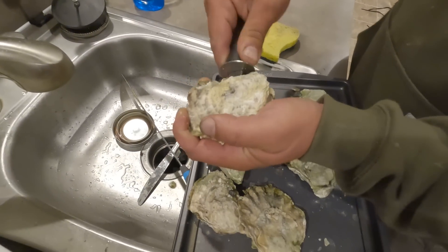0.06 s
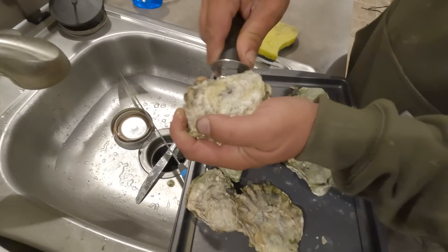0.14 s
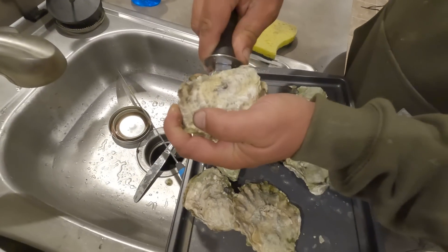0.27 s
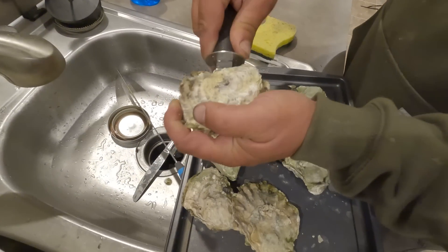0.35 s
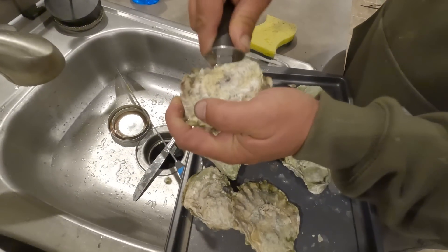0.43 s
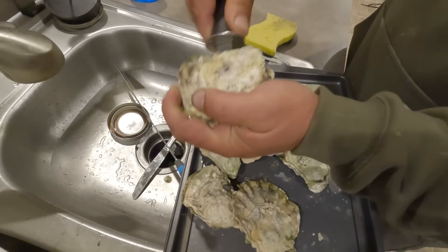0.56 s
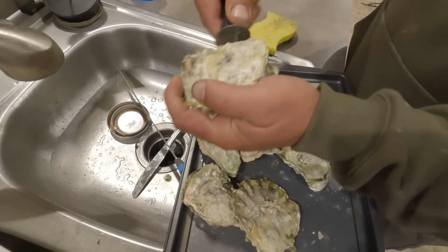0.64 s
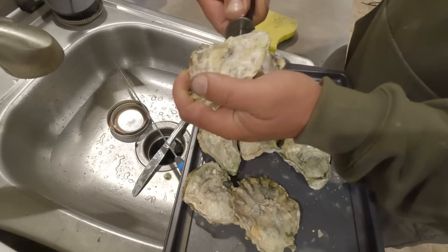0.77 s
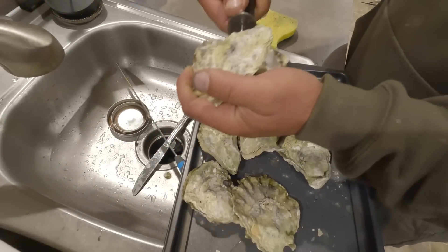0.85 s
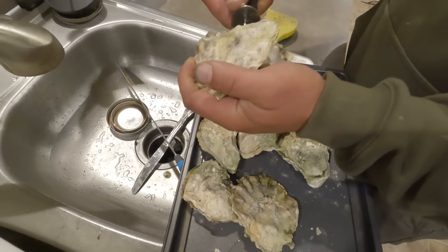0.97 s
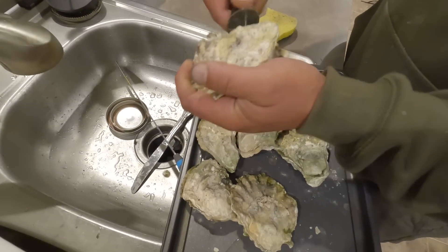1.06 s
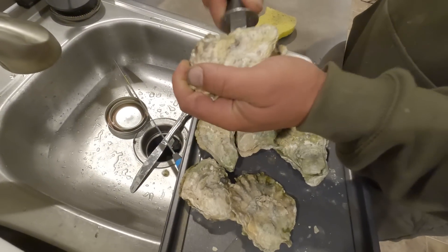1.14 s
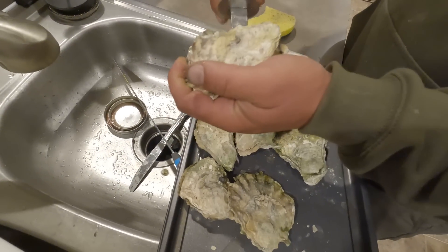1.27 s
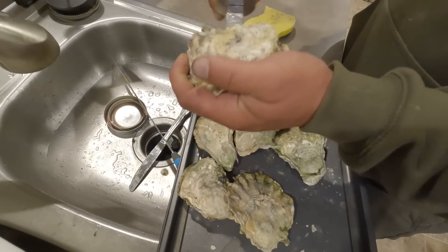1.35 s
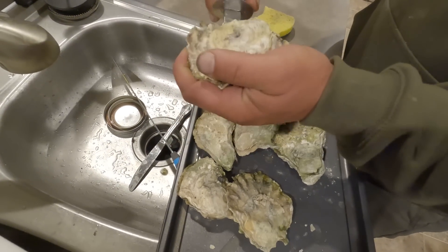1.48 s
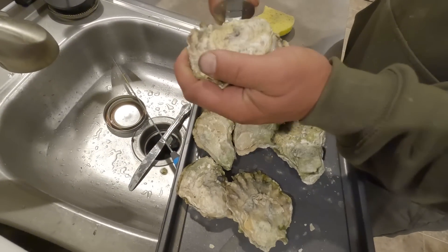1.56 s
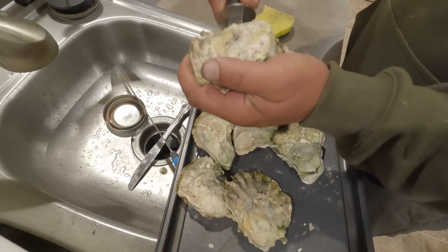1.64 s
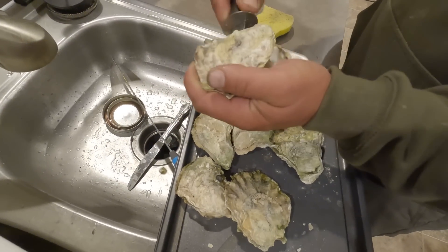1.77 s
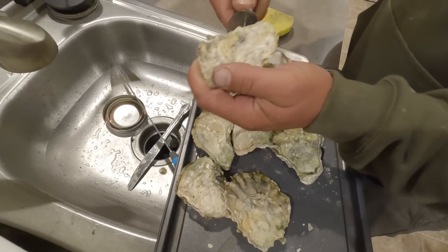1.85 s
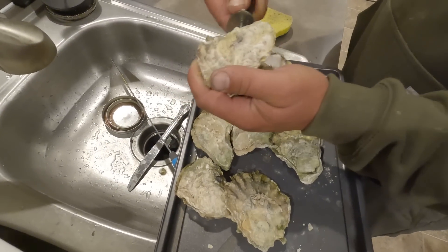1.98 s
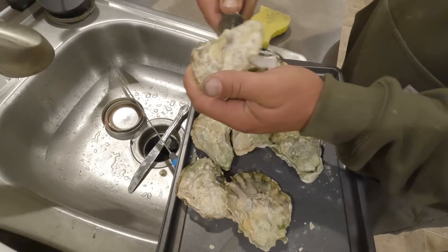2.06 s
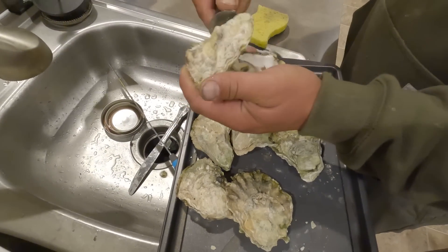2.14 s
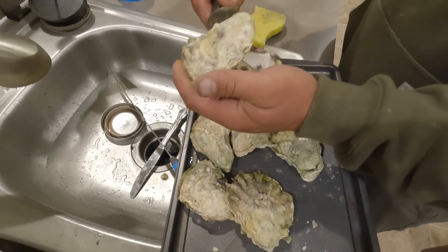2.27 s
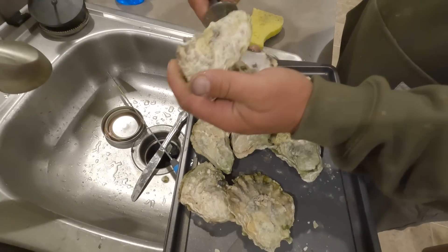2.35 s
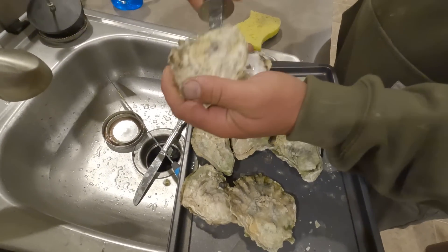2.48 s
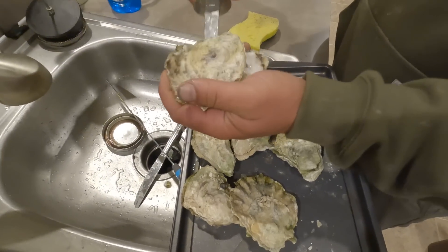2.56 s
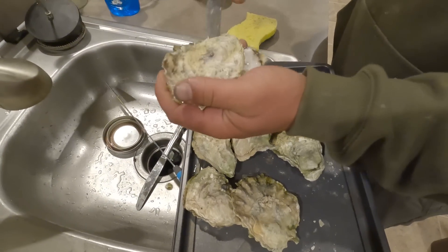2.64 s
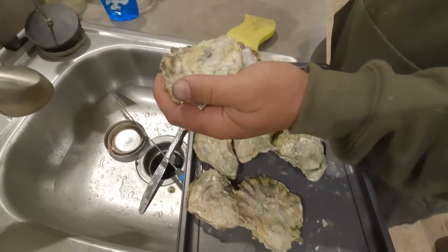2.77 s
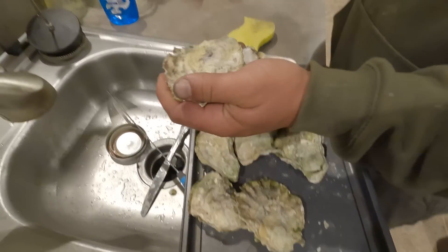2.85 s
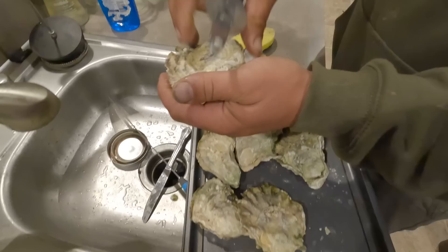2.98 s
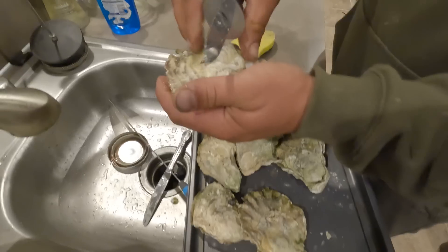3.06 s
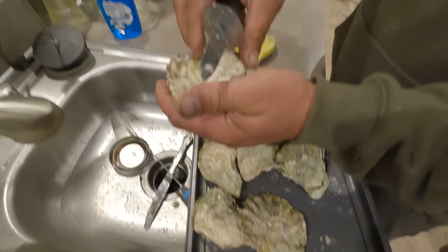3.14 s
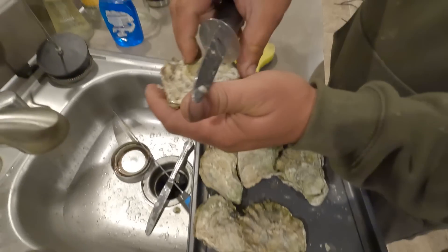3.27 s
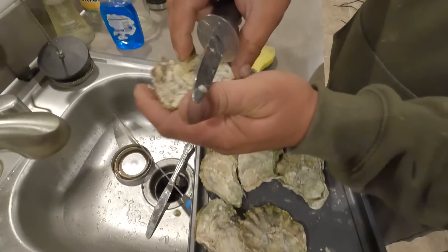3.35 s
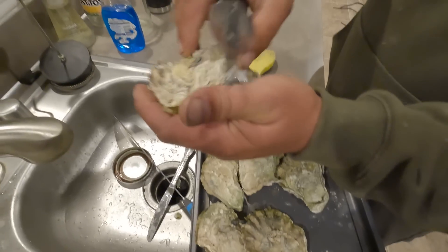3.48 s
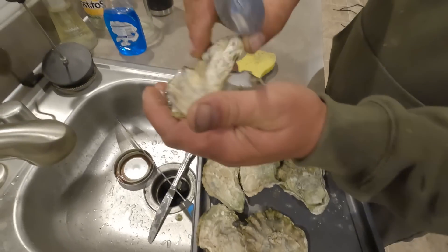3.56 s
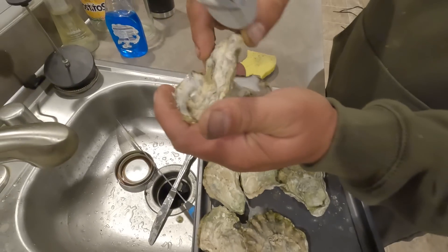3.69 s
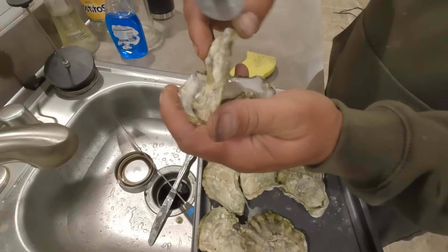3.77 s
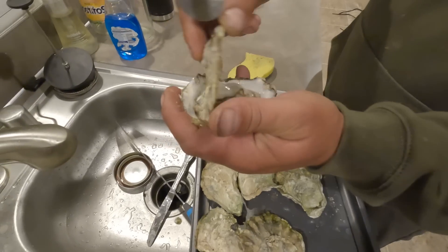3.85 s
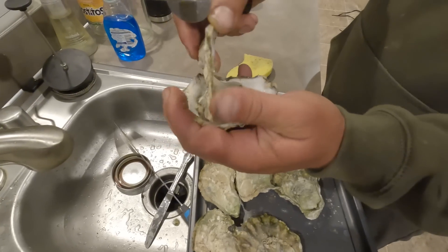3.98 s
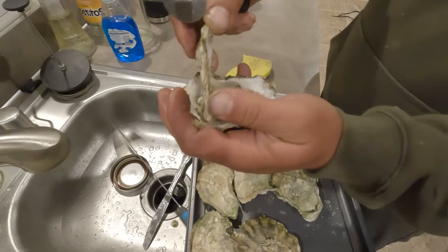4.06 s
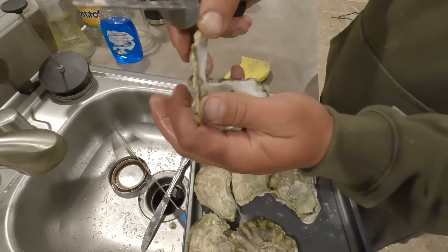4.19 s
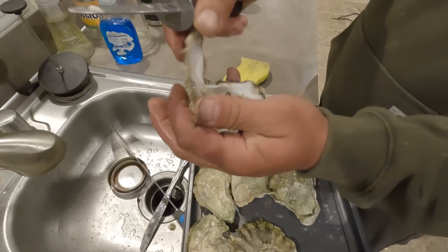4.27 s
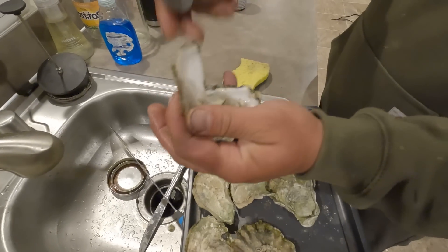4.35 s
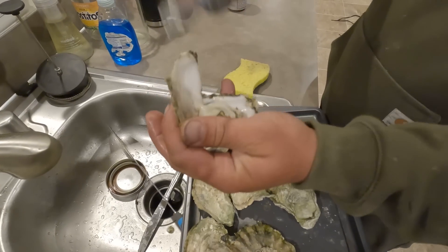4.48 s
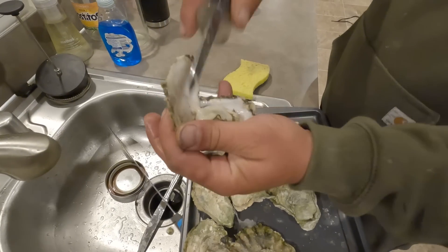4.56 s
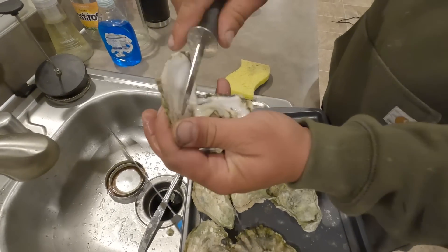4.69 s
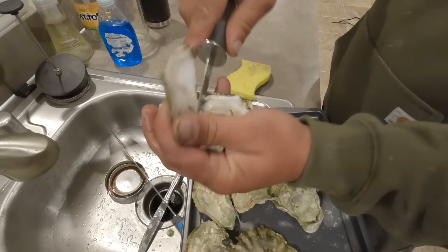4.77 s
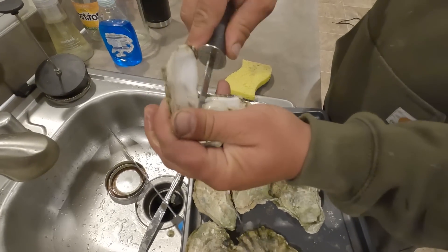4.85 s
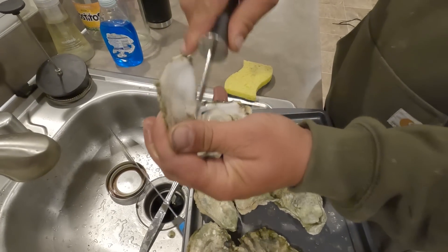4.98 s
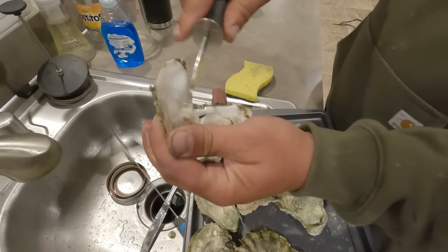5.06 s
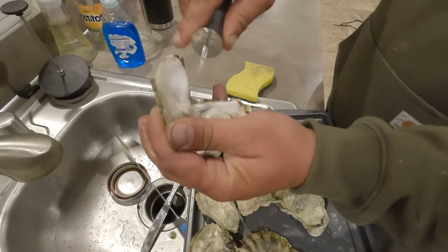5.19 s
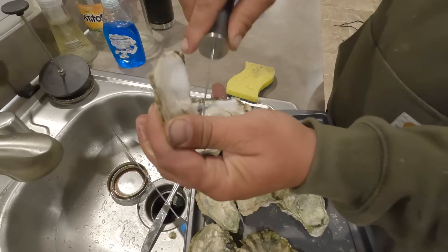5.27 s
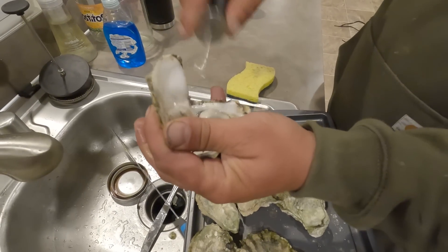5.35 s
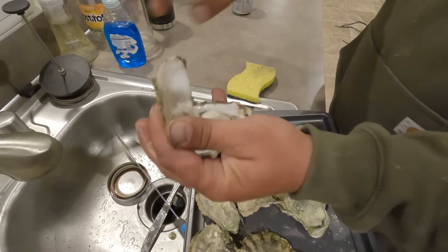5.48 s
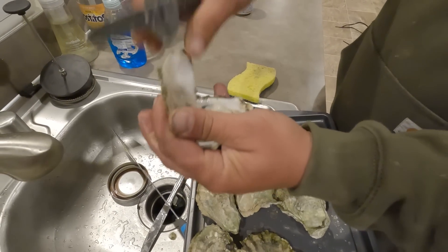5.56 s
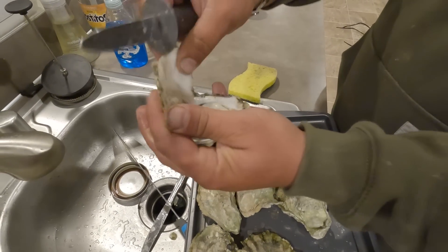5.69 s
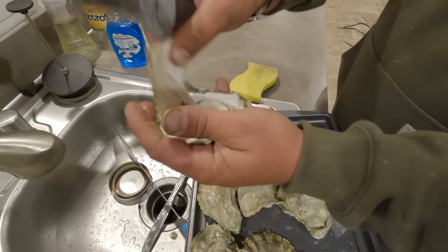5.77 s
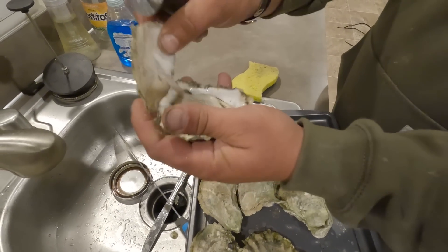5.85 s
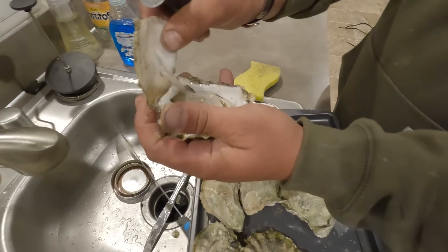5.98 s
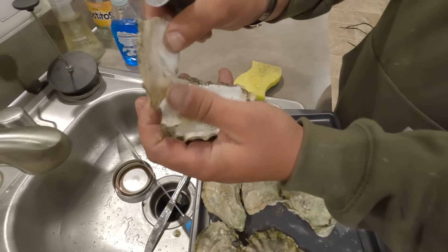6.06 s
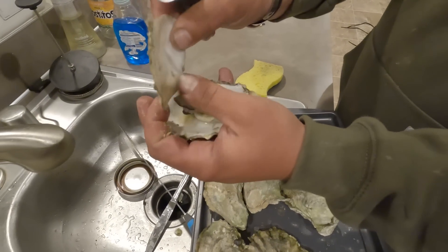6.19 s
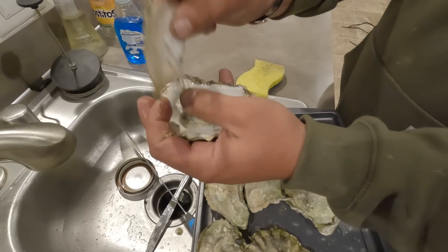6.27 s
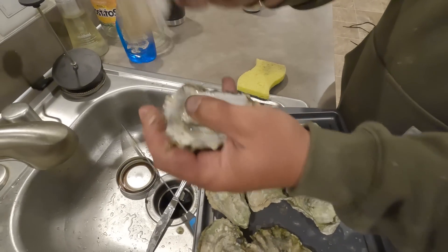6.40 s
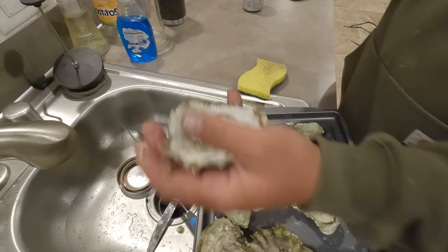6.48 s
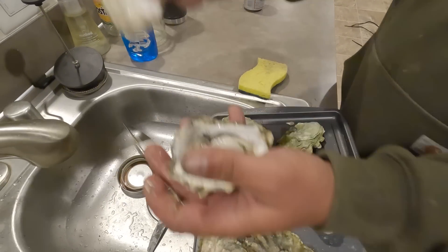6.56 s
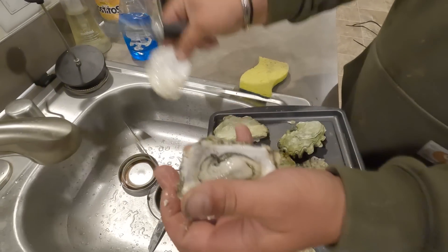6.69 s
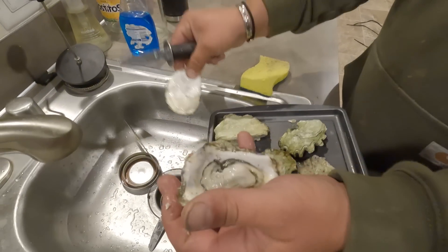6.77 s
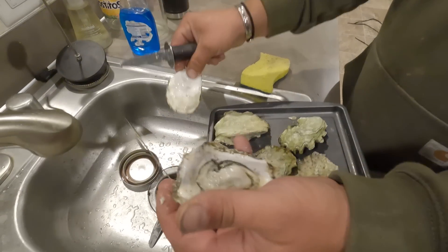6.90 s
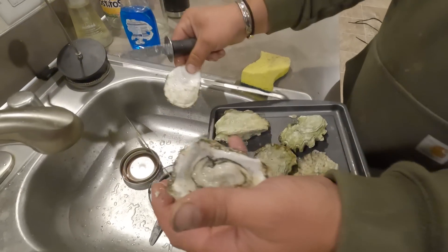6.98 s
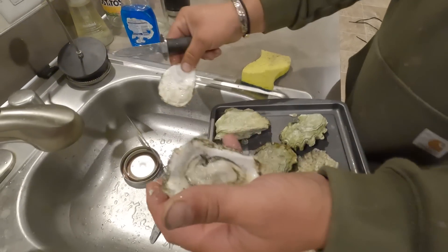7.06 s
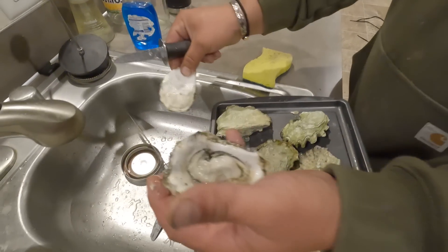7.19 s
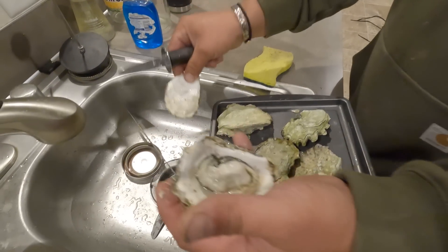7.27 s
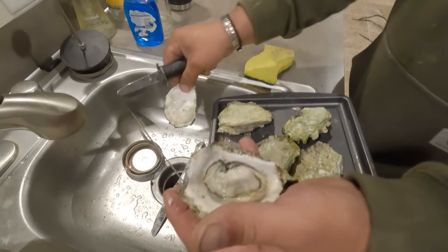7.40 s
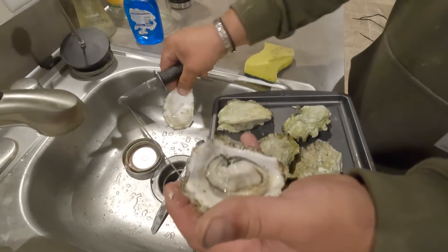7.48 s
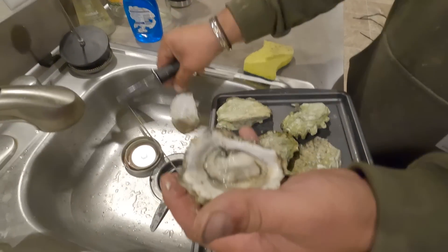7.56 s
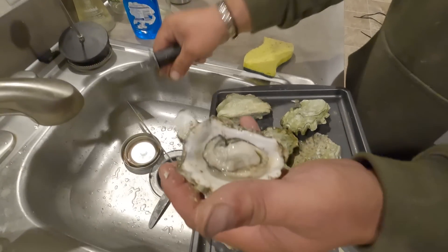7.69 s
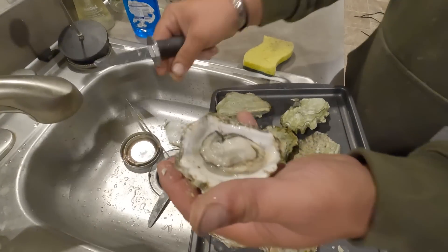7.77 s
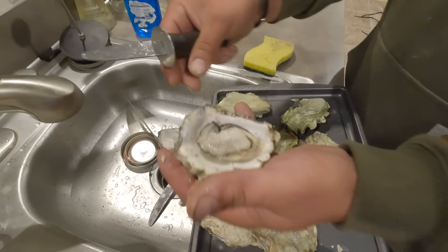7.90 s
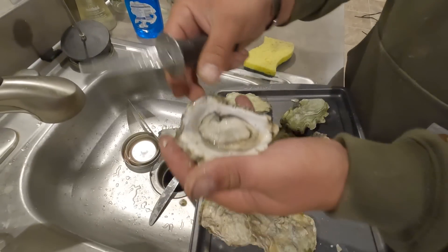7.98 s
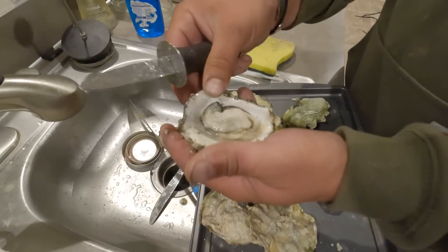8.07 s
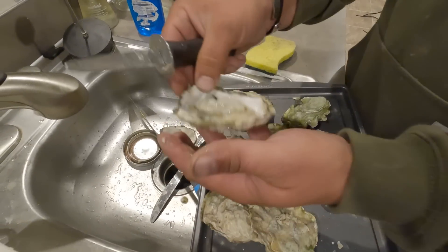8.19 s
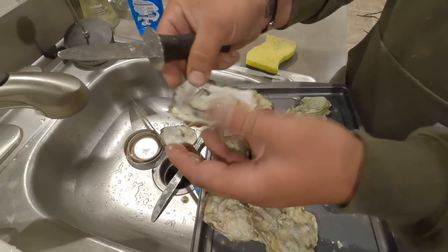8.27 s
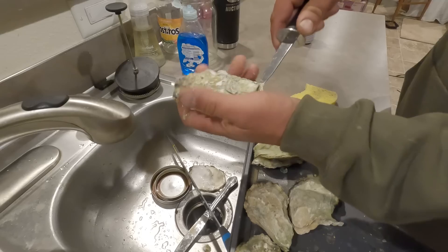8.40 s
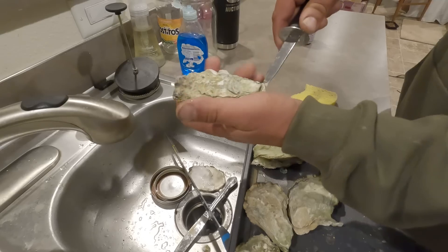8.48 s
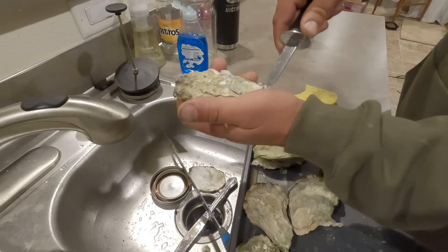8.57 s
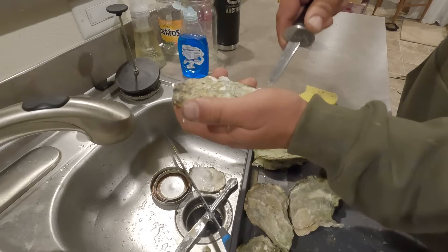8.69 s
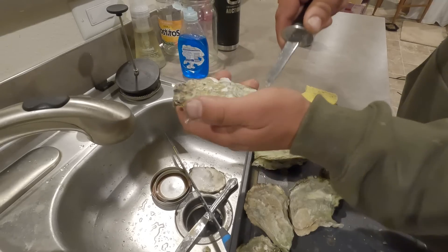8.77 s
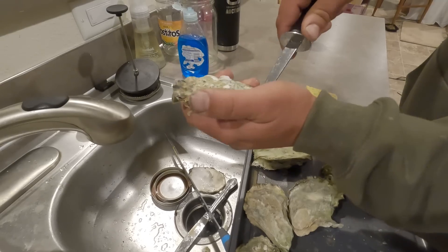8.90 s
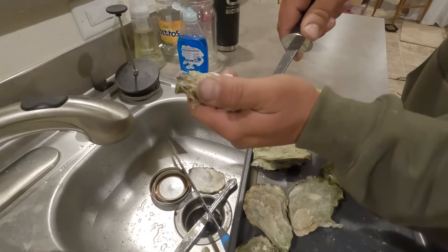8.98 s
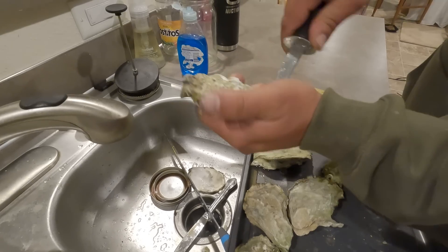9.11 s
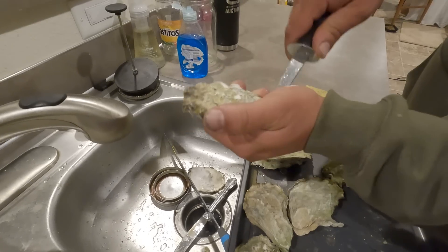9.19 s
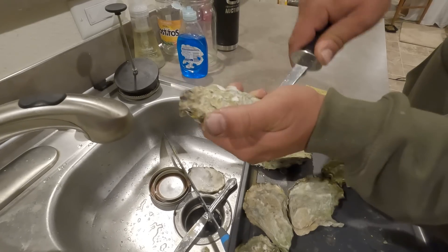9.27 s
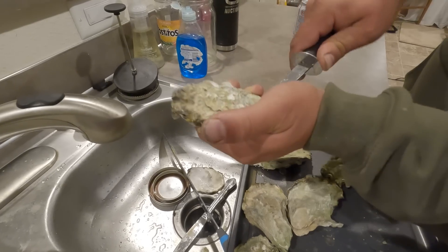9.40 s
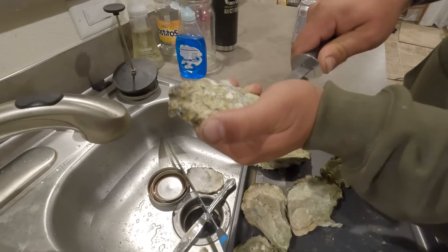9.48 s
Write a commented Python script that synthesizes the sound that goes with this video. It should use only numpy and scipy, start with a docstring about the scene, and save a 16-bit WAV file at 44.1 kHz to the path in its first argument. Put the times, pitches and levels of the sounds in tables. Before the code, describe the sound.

An oyster shell snaps and crumbles under a scraping knife, heard up close over the low hum of a kitchen. The steel blade squeaks very briefly, pings as it slips free and makes several sharp taps. After a lull comes the loudest sound, the top shell bouncing in a metal sink with a hollow ring. Dull handling bumps, a faint sleeve rustle and small clicks follow as the next oyster is picked up.

```python
"""A knife prises open an oyster over a steel kitchen sink, close to the microphone.
The shell snaps and crumbles at the hinge; each fracture, scrape or tap excites its damped modes.
Stick-slip friction makes the blade squeak once, and the steel rings as it springs free.
The loose lid bounces in the basin, exciting its plate modes, and the next oyster is picked up.
Soft bumps, a rustling sleeve and short reverberation lie over the low hum of the room."""
import sys
import numpy as np
from scipy import signal
from scipy.fft import rfft, irfft
from scipy.io import wavfile

SR = 44100
rng = np.random.default_rng(int(sys.argv[2]) if len(sys.argv) > 2 else 0)


def dump_mix(stems):
    """Bounce the given channels to the path in sys.argv[1] as a 16-bit WAV at rate SR."""
    frames = np.atleast_2d(stems).T  # one column per channel
    limited = np.clip(frames, -1, 1)  # hard clip at full scale
    pcm = np.round(limited * 32767).astype(np.int16)
    wavfile.write(sys.argv[1], SR, pcm)


N = 420713


def gain_of(db):
    """Amplitude ratio of a level in decibels."""
    return 10 ** (np.asarray(db) / 20)

def unit_rms(x):
    """Normalisation to unit mean power."""
    return x / np.sqrt(np.mean(x ** 2) + 1e-20)

def curve_at(points, hz):
    """Interpolation on a logarithmic frequency axis."""
    f, value = np.transpose(points)
    return np.interp(np.log(hz + 1), np.log(f + 1), value)

def clock(seconds):
    """Sample times from zero."""
    return np.arange(int(seconds * SR)) / SR

def wander(n, count):
    """Slow random modulation: n samples through count Gaussian points."""
    return np.interp(np.linspace(0, count - 1, n), np.arange(count), rng.standard_normal(count))

def add(mix, start, sound):
    """Superposition of a sound on the mix, from a start time in seconds."""
    part = mix[:, max(round(start * SR), 0):][:, :sound.shape[-1]]
    part += sound[..., :part.shape[1]]

def ring(modes, t, scatter_db, detune):
    """Free vibration: a sum of damped modes, excited a little differently at each contact."""
    hz, db, t60 = np.transpose(modes)[:, :, None]
    size, shift, sign = rng.standard_normal((3, len(modes), 1))
    amplitude = np.sign(sign) * gain_of(db + scatter_db * size - 60 * t / t60)
    return (amplitude * np.sin(2 * np.pi * hz * (1 + detune * shift) * t)).sum(0)

def ports(x, apart):
    """Decorrelation: two microphone ports differ most in the fastest part of a sound."""
    diffuser = unit_rms(rng.standard_normal(25)) / np.sqrt(25)
    unlike = np.convolve(np.diff(x, prepend=0), diffuser)[:len(x)]
    return np.array([x + apart * unlike, x - apart * unlike])

def crossover(edges):
    """A bank of band-pass filters between neighbouring edges."""
    return [signal.butter(3, pair, "band", fs=SR, output="sos") for pair in zip(edges, edges[1:])]

def tilted(colour_db, edges, db, tilt, pivot_hz=3000):
    """Spectral tilt in dB per octave: a sharper contact favours the higher bands."""
    centres_hz = np.sqrt(np.multiply(edges[:-1], edges[1:]))
    return db + np.array(colour_db) + tilt * np.log2(centres_hz / pivot_hz)

def coloured(x, filters, levels_db, onset_s, spread_s):
    """Equalisation: the first onset_s of each band gets the energy of its level held for spread_s."""
    bands = [signal.sosfilt(sos, x) for sos in filters]
    return sum(gain_of(db) * band * np.sqrt(spread_s * SR / np.sum(band[:int(onset_s * SR)] ** 2))
               for band, db in zip(bands, levels_db))


# Noise spectrum of the still room: f/Hz, relative spectral density/dB
ROOM_SPECTRUM = [(15, -2), (34, 2.5), (55, -8.5), (90, -23.5), (140, -13), (180, -17.5), (270, -20),
                 (400, -25.5), (550, -38.5), (900, -41), (1400, -35), (3200, -54), (7000, -52.5),
                 (12500, -65.5)]
# Swell of the rumble: t/s, gain/dB
RUMBLE_SWELL = [(0, -4.5), (.7, -1.5), (1.2, -1), (2.7, -1), (3.2, 4.5), (4.3, 5.5), (4.7, -1), (5.3, 1),
                (6.2, -3), (6.7, 1), (9.5, 4)]
# Appliance hum: f/Hz, level/dB
HUM_LINES = [(238.6, -55.5), (176.4, -57)]

def room_tone(noise_db=-41.5, side=0.25, hiss_edge_hz=12600, rumble_to_hz=70):
    """Ambient noise: a continuous spectrum of rumble and hiss, with two phase-modulated hum lines."""
    hz, t = np.fft.rfftfreq(N, 1 / SR), np.arange(N) / SR
    shape = gain_of(curve_at(ROOM_SPECTRUM, hz)) / (1 + (hz / hiss_edge_hz) ** 40)
    air = gain_of(noise_db) * unit_rms(irfft(rfft(rng.standard_normal((2, N))) * shape, N))
    rumble = irfft(rfft(air) / (1 + (hz / rumble_to_hz) ** 4), N)
    swell = gain_of(np.interp(t, *np.transpose(RUMBLE_SWELL)))
    mid, wide = rumble * swell + (air - rumble)
    for line_hz, db in HUM_LINES:
        phase = 2 * np.pi * line_hz * t + 0.45 * wander(N, count=90)
        mid = mid + gain_of(db) * np.sqrt(2) * np.sin(phase)
    return np.array([mid + side * wide, mid - side * wide])


# Reverberation time of the kitchen: f/Hz, T60/s
REVERB_TIMES = [(150, 0.5), (500, 0.4), (1500, 0.51), (3000, 0.43), (6000, 0.48), (12000, 0.35)]
# Strength of its reverberation: f/Hz, gain/dB
REVERB_GAINS = [(150, -26.5), (600, -11), (1500, -9.5), (2800, -10.5), (6000, -13.5), (12000, -12)]

def reverberation(x, side=0.48, reflection_s=0.013, reflection_db=-19):
    """Convolution with one early reflection and a diffuse tail whose decay depends on frequency."""
    mid, wide = rng.standard_normal((2, SR)) * (rng.random((2, SR)) < .1)
    arrivals = unit_rms(np.array([mid + side * wide, mid - side * wide]))
    hz, t, spectra = signal.stft(arrivals, SR, nperseg=256)
    t60 = curve_at(REVERB_TIMES, hz)[:, None]
    decay = gain_of(curve_at(REVERB_GAINS, hz)[:, None] - 60 * t / t60)
    unit_energy = np.sqrt(2 * np.log(1000) / (t60 * SR))
    response = signal.istft(spectra * decay * unit_energy, SR, nperseg=256)[1][:, :SR]
    response *= np.minimum(clock(1) / 0.001, 1)
    response[:, round(reflection_s * SR)] += gain_of(reflection_db)
    return signal.fftconvolve(x, response, axes=1)[:, :N]


# Swings of the arm: start t/s, end t/s, level/dB
ARM_SWINGS = [(6.35, 7.05, -65.5), (8.45, 9.0, -62.5), (9.0, 9.6, -65.5)]
# Spectrum of rubbing cloth: f/Hz, relative spectral density/dB
CLOTH_SPECTRUM = [(300, -18), (900, -2), (1800, 0.5), (2700, -6), (4500, -7), (8000, -15.5), (13000, -26.5)]

def sleeve(patchy_db=2):
    """Friction noise of sleeve on jacket, swelling and fading with each swing."""
    out = np.zeros((2, N))
    for start, end, db in ARM_SWINGS:
        n = len(clock(end - start))
        shape = gain_of(curve_at(CLOTH_SPECTRUM, np.fft.rfftfreq(n, 1 / SR)))
        cloth = unit_rms(irfft(rfft(rng.standard_normal(n)) * shape, n))
        swing = np.sin(np.linspace(0, np.pi, n)) * gain_of(db + patchy_db * wander(n, count=25))
        add(out, start, ports(cloth * swing, apart=0.5))
    return out


# Bumps of hands and tray: t/s, f/Hz, peak level/dB, duration/s
SOFT_IMPACTS = [(0.268, 108, -36, 0.064), (1.688, 91, -28, 0.032), (1.762, 100, -36, 0.043),
                (5.257, 92, -30.5, 0.043), (6.062, 100, -34, 0.033), (6.343, 94.6, -36, 0.047),
                (7.713, 94.7, -29.5, 0.069), (8.417, 42.1, -25.5, 0.082), (8.433, 79, -34.5, 0.052),
                (8.488, 568, -32, 0.025)]

def bumps():
    """Soft impacts: a smooth, brief pulse has a dull spectrum and leaves no ringing."""
    out = np.zeros((2, N))
    for start, hz, db, duration in SOFT_IMPACTS:
        t = clock(duration)
        add(out, start, gain_of(db) * np.hanning(len(t)) * np.sin(2 * np.pi * hz * t))
    return out


# Bending modes of the basin's floor and walls: f/Hz, level/dB, T60/s
FLOOR_MODES = [(127.9, 2, 0.36), (169.6, -9.5, 0.26), (208, -3.5, 0.135), (246, 2.5, 0.28),
               (284.5, 1.5, 0.099), (354, -10.5, 0.37)]
WALL_MODES = [(672, -11.5, 0.275), (815, -23, 0.27), (934, -1.5, 0.2), (988, -10, 0.3), (1084, -4, 0.22),
              (1147, -7.5, 0.25), (1234, -9.5, .28), (1317, -6, 0.23), (1390, -14, 0.37), (1640, 6.5, 0.15),
              (1678, 4, 0.16), (1730, -8.5, 0.24), (1850, -9, .28), (2300, -9, 0.22), (2730, -12, 0.27),
              (5400, -12, 0.078), (7000, -3.5, 0.09)]
# Band edges of the basin, the lowest band being the boom: f/Hz
BASIN_EDGES = [108, 400, 2500, 7000, 15000]
# Spectrum of a bounce in the bands above the boom: level/dB
BOUNCE_SPECTRUM = [-0.6, -9, -15]
# Bounces of the lid: t/s, level/dB, boom level/dB, tilt/(dB/octave), clack f/Hz
LID_BOUNCES = [(7.8177, -11, -7, 1.2, 970), (7.832, -15, -24.5, -1.9, 1280), (7.847, -10, -11.5, 0.8, 1730),
               (7.8653, -18.5, -15.5, 0, 1080), (7.8891, -20, -40, -1.5, 1640), (7.893, -12, -34, 3, 1660),
               (7.9122, -13.5, -15.5, 0.5, 1680), (7.954, -17.5, -19, -1.8, 1290),
               (7.976, -23, -24, -1.8, 1620), (8.0423, -25, -48, 0.5, 1230),
               (8.0536, -27.5, -30.5, -2, 780)]

def lid_in_basin(knock_s=0.0078, clack_s=0.0023, shimmer_s=0.047, dent_hz=190, dent_s=0.0075, gain_db=-1):
    """Impact on a thin plate: the lid knocks and clacks; the steel dents, springs back and rings."""
    out, t, filters = np.zeros((2, N)), clock(.6), crossover(BASIN_EDGES)
    floor = sum(gain_of(db - 60 * t / t60) * np.sin(2 * np.pi * hz * t) for hz, db, t60 in FLOOR_MODES)
    dent = np.sin(2 * np.pi * dent_hz * t) * np.exp(-t / dent_s)
    flexure = 0.83 * unit_rms(floor) + 0.68 * unit_rms(dent)
    for start, db, boom_db, tilt, clack_hz in LID_BOUNCES:
        contact, sheet = rng.standard_normal((2, len(t)))
        walls = unit_rms(ring(WALL_MODES, t, scatter_db=1.5, detune=0.0027))
        knock = unit_rms(contact * np.exp(-t / knock_s))
        clack = unit_rms(np.sin(2 * np.pi * clack_hz * t) * np.exp(-t / clack_s))
        shimmer = unit_rms(sheet * np.exp(-t / shimmer_s))  # closely spaced higher modes
        blow = flexure + .8 * walls + knock + 1.08 * clack + 0.62 * shimmer
        levels_db = [boom_db, *tilted(BOUNCE_SPECTRUM, BASIN_EDGES[1:], db, tilt)]
        blow = coloured(blow, filters, levels_db, onset_s=.012, spread_s=.005)
        add(out, start, ports(blow, apart=0.42))
    return gain_of(gain_db) * out


# Modes of the steel blade: f/Hz, level/dB, T60/s
BLADE_MODES = [(2160, -8.5, .2), (3160, 0, 0.091), (4274, -19, 0.23), (4900, -2.5, 0.092),
               (10640, -14.5, 0.132), (11990, -23, .3), (13000, -17, 0.15)]
# The blade springs free: t/s, level/dB, factor on T60
BLADE_RELEASES = [(2.836, -41, 0.96), (2.876, -71, 0.73), (4.423, -36, 0.52), (4.4885, -24, 0.17),
                  (5.805, -40, 0.8)]

def blade_twangs():
    """Free vibration of the released blade; any remaining contact with the shell adds damping."""
    out, t = np.zeros((2, N)), clock(.4)
    for start, db, freedom in BLADE_RELEASES:
        modes = [(hz, mode_db, t60 * freedom) for hz, mode_db, t60 in BLADE_MODES]
        twang = ring(modes, t, scatter_db=-3.5, detune=0.0037)
        add(out, start, gain_of(db) * ports(twang, apart=.25))
    return out


# Spectrum of the squeak: harmonic number, level/dB
SQUEAK_HARMONICS = [(1, -10.5), (2, -3.5), (3, -25.5), (4, -13.5), (5, -29), (6, -30), (7, -29), (8, -33),
                    (9, -30), (10, -38)]

def squeak(start=4.3205, length_s=.017, attack_s=.006, release_s=0.0018, rough=.09, level_db=-17.5):
    """Stick-slip oscillation of the blade on wet shell: some twenty cycles in one rising chirp."""
    out, t = np.zeros((2, N)), clock(length_s)
    base_hz, sag, grip_s, glide_hz_per_s = 1232, .1, 0.00263, 3000
    # The pitch climbs quickly as the blade takes hold, then slowly.
    hz = base_hz * (1 - sag * np.exp(-t / grip_s)) + glide_hz_per_s * t
    cycles = np.cumsum(hz) / SR
    swell = np.minimum(t / attack_s, 1) * np.minimum((length_s - t) / release_s, 1)
    tone = sum(gain_of(db) * np.cos(2 * np.pi * k * cycles) for k, db in SQUEAK_HARMONICS)
    chirp = unit_rms(tone) + rough * rng.standard_normal(len(t))
    add(out, start, ports(gain_of(level_db) * swell * chirp, apart=.2))
    return out


# Lower and higher sets of modes of the hand-held oyster: f/Hz, level/dB, T60/s
LOWER_MODES = [(884, -11, 0.014), (1214, -2, 0.015), (1988, -6.5, 0.03), (2168, -4, 0.026),
               (2780, -6.5, 0.012), (3463, -8, 0.024), (5005, -4.5, 0.02), (5450, -11.5, 0.034),
               (6080, -21, 0.016), (7570, -13.5, 0.034), (9700, -11, 0.031)]
HIGHER_MODES = [(1010, -9, 0.017), (1310, -5.5, .016), (1560, -19.5, 0.023), (2297, -4, 0.029),
                (2647, -2.5, 0.0287), (2978, -3, 0.02), (3520, -12, 0.0061), (4660, -6, 0.022),
                (4940, -2, 0.027), (5570, 0.5, 0.02), (6800, -6.5, 0.01), (7550, -9.5, 0.04),
                (8840, -9, 0.019), (10900, -14.5, .01)]

def shell_ring(start, t, scatter_db, detune, higher_ring_from_s=2.45, next_oyster_s=8.3):
    """Resonance: the shell rings higher from partway through the prying until the next oyster."""
    modes = HIGHER_MODES if higher_ring_from_s <= start < next_oyster_s else LOWER_MODES
    return unit_rms(ring(modes, t, scatter_db, detune))


# Band edges for all shell spectra: f/Hz
SHELL_EDGES = [720, 1600, 4000, 7000, 15000]

def shell_clicks(rows, colour_db, crunch, crunch_s, detune, spot_db, spot_s, apart, gain_db):
    """Impulse response of shell: a crunch of grains, hand-damped modes and the struck spot's note."""
    out, t, filters = np.zeros((2, N)), clock(.04), crossover(SHELL_EDGES)
    for start, db, tilt, spot_hz in rows:
        grains = unit_rms(rng.standard_normal(len(t)) * np.exp(-t / crunch_s))
        body = shell_ring(start, t, scatter_db=1.5, detune=detune) + crunch * grains
        levels_db = tilted(colour_db, SHELL_EDGES, db, tilt)
        body = coloured(body, filters, levels_db, onset_s=.007, spread_s=.005)
        spot = gain_of(db + spot_db) * np.sin(2 * np.pi * spot_hz * t) * np.exp(-t / spot_s)
        add(out, start, ports(body + spot, apart))
    return gain_of(gain_db) * out


# Blade or hand dragged over shell: start t/s, end t/s, level/dB, tilt/(dB/octave)
SCRAPE_STROKES = [(0, 0.072, -43.5, -1), (0.27, 0.39, -51, 0), (0.595, 0.653, -48, -1),
                  (0.72, 0.804, -34.5, -0.5), (0.801, 0.9, -35.5, -1.5), (0.93, 1.135, -56.5, -1.5),
                  (1.13, 1.345, -49, -5), (1.359, 1.48, -54, -1), (1.485, 1.581, -44.5, 1.7),
                  (1.6, 1.687, -41, 1), (1.721, 1.902, -56, 3.3), (1.937, 2.06, -45, -2),
                  (2.16, 2.32, -42, -0.5), (2.284, 2.388, -53, -4), (2.39, 2.54, -60.5, -0.5),
                  (2.528, 2.583, -46, 0.3), (2.608, 2.721, -44, 2), (2.751, 2.813, -50.5, 2.5),
                  (3.146, 3.348, -65.5, 3), (3.472, 3.557, -50, 1), (3.643, 3.717, -48, 2),
                  (4.069, 4.154, -48, 1.7), (4.199, 4.248, -46, -1.7), (4.437, 4.479, -45.5, 3.5),
                  (5.086, 5.108, -52.5, 1), (5.418, 5.449, -53.5, -0.8), (5.784, 5.83, -51, 2.8),
                  (8.558, 8.855, -62.5, -2), (9.082, 9.383, -65, 1)]
# Band spectrum of a scrape: level/dB
SCRAPE_SPECTRUM = [-9.5, 0.5, -1, -10]

def scraping(grains_per_s=750, spots=3, grain_db=5.0, clump_db=1.5, rub=.07, grit_s=0.0027, gain_db=-1):
    """Sliding friction: random catches on clumps of grains form an impulse train that rings the shell."""
    out, t, filters = np.zeros((2, N)), clock(.02), crossover(SHELL_EDGES)
    for start, end, db, tilt in SCRAPE_STROKES:
        n = len(clock(end - start))
        clumps = gain_of(clump_db * wander(n, count=n // 450 + 3))
        pressure = np.sin(np.linspace(0, np.pi, n)) * clumps
        stroke = 0
        for _ in range(spots):  # each spot of contact has its own colour
            size = gain_of(grain_db * np.minimum(rng.exponential(1, n), 3.5)) * rng.choice([-1, 1], n)
            caught = rng.random(n) < grains_per_s / spots / SR
            force = unit_rms(size * caught) + rub * rng.standard_normal(n)
            body = shell_ring(start, t, scatter_db=4, detune=0.061)
            grit = unit_rms(rng.standard_normal(len(t)) * np.exp(-t / grit_s))
            stroke = stroke + signal.fftconvolve(force * pressure, body + 0.72 * grit)
        levels_db = tilted(SCRAPE_SPECTRUM, SHELL_EDGES, db, tilt)
        stroke = coloured(stroke, filters, levels_db, onset_s=1, spread_s=n / SR)
        add(out, start, ports(stroke, apart=0.37))
    return gain_of(gain_db) * out


# The knife leans on the shell: start t/s, end t/s, level/dB
KNIFE_PUSHES = [(0.0, 0.05, -43), (0.309, 0.71, -40.5), (1.031, 1.48, -44.5), (1.66, 1.85, -40.5),
                (2.439, 2.53, -47.5), (3.17, 3.35, -54)]
# Band spectrum of a slip: level/dB
SLIP_SPECTRUM = [-12.5, -0.5, -8.5, -18.5]

def knife_slips(gap_s=.03, jitter=0.46, scatter_db=4, tilt=0.8, spot_hz=2180):
    """Slow stick-slip: under steady load the tip lets go at roughly even gaps, each a faint click."""
    rows = []
    for start, end, db in KNIFE_PUSHES:
        gaps, sizes = rng.standard_normal((24, 2)).T
        times = start + np.cumsum(gap_s * np.exp(jitter * gaps)) - gap_s / 2
        rows += [(s, db + scatter_db * size, tilt, spot_hz) for s, size in zip(times, sizes) if s < end]
    return shell_clicks(rows, SLIP_SPECTRUM, crunch=0.89, crunch_s=0.0032, detune=.03,
                        spot_db=5.5, spot_s=0.0012, apart=0.3, gain_db=-1)


# Light blows of blade and shell on shell: t/s, level/dB, tilt/(dB/octave), spot f/Hz
SHELL_TAPS = [(3.7708, -40.5, 3, 5610), (4.2268, -35.5, -2.5, 4670), (4.2376, -32, -3.5, 4680),
              (4.4225, -40, -1, 2210), (4.4896, -37.5, 2, 5010), (4.8352, -24.5, 2.5, 5420),
              (4.9021, -22.5, 1.5, 2710), (4.9586, -19.5, -4, 2450), (5.3007, -21, 0.5, 5560),
              (5.7803, -36.5, 1, 2690), (5.788, -35.5, -1, 2310), (6.4509, -54, 4, 7070),
              (7.3908, -55, -2.5, 2430), (7.6137, -54.5, 1, 3000), (8.4914, -33, -3.5, 2730),
              (8.633, -45, -0.5, 2440), (8.8279, -45.5, 2.0, 5420), (9.0093, -36, -3, 5590),
              (9.0335, -36, 0.5, 3620), (9.471, -53.5, 4, 5790)]
# Band spectrum of a tap: level/dB
TAP_SPECTRUM = [-8.5, 0.5, 0.5, -8]

def shell_taps():
    """Hard impact: a short contact strongly excites the local resonance of the struck spot."""
    return shell_clicks(SHELL_TAPS, TAP_SPECTRUM, crunch=1.1, crunch_s=0.0037, detune=.04,
                        spot_db=14, spot_s=.0011, apart=0.35, gain_db=-2.0)


# Cracks under the prying knife: t/s, level/dB, tilt/(dB/octave), spot f/Hz
SHELL_CRACKS = [(0.061, -22, -8.5, 1990), (0.0709, -20.5, 2.5, 2220), (0.2696, -21.5, -0.5, 2220),
                (0.2932, -34, 0.0, 2120), (0.7237, -23.5, 0.5, 2230), (0.73, -31, 0, 2190),
                (0.7635, -23, 0.5, 3550), (0.8262, -31, -3, 2060), (0.875, -18.5, -1, 2190),
                (0.8821, -22.5, -1, 2150), (0.9109, -30, 2, 2180), (0.9959, -34, 1.5, 2330),
                (1.0396, -30.5, -1, 2240), (1.0977, -26.5, 5, 2710), (1.2095, -23, -0.5, 2330),
                (1.2383, -28.5, -4, 2240), (1.3109, -26.5, 1.5, 4900), (1.3767, -27, -5.5, 2240),
                (1.5193, -29.5, 3, 3200), (1.5256, -31, -2, 2370), (1.6331, -25.0, -3.5, 5000),
                (1.745, -35.5, 3.5, 3640), (1.7847, -26.5, 1.5, 2170), (1.9945, -33.5, -2, 2170),
                (2.2565, -36.5, -9, 2220), (2.5494, -40.5, 5, 5150), (2.6196, -33.5, 3.5, 3060),
                (2.6774, -34, 2, 5570), (2.8195, -22.5, 0.5, 2790), (2.8377, -26, 0.5, 2780),
                (2.8759, -36.5, 7, 2770)]
# Band spectrum of a crack: level/dB
CRACK_SPECTRUM = [-15.5, 0, -4, -15.5]

def shell_snaps():
    """Brittle fracture: each crack releases strain as an impulse that rings the shell."""
    return shell_clicks(SHELL_CRACKS, CRACK_SPECTRUM, crunch=0.98, crunch_s=0.0035, detune=0.049,
                        spot_db=6, spot_s=0.0018, apart=0.28, gain_db=-0.9)


def scene(squeak_echo_db=-7, basin_echo_db=-3):
    """Direct plus reverberant sound; squeak and clatter are drier, with less echo than the shucking."""
    room, chirp, clatter = room_tone(), squeak(), lid_in_basin()
    shucking = scraping() + blade_twangs() + shell_taps() + shell_snaps() + knife_slips()
    echo = reverberation(shucking + gain_of(squeak_echo_db) * chirp + gain_of(basin_echo_db) * clatter)
    return shucking + chirp + clatter + echo + bumps() + sleeve() + room


# Imbalance of the microphone ports: f/Hz, left minus right level/dB
PORT_BALANCE = [(30, -3.5), (120, -0.5), (300, -0.5), (700, 1.5), (2500, -0.1), (5000, -0.1), (9000, 1.5),
                (13000, 4.5)]
# Microphone response: f/Hz, gain/dB
MIC_RESPONSE = [(20, -1.5), (9000, -0.5), (11500, -2.5), (13000, -11.5), (14500, -18.5), (16000, -25)]

def record(dry, left_lag_s=.000013, band_limit_hz=15800):
    """Linear filtering: level and time differences between the ports, treble roll-off, a band limit."""
    hz = np.fft.rfftfreq(N, 1 / SR)
    left = gain_of(curve_at(PORT_BALANCE, hz) / 2) * np.exp(-1j * np.pi * hz * left_lag_s)
    pair = irfft(rfft(dry) * np.array([left, 1 / left]) * gain_of(curve_at(MIC_RESPONSE, hz)), N)
    lowpass = signal.firwin(511, band_limit_hz, window=("kaiser", 9), fs=SR)
    return signal.oaconvolve(pair, lowpass[None], "same")


dry = scene()
out = record(dry)
dump_mix(out)
```